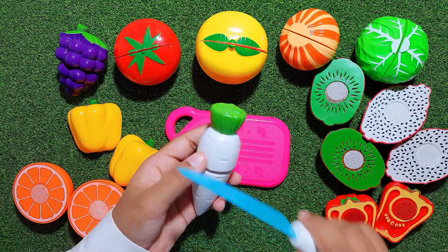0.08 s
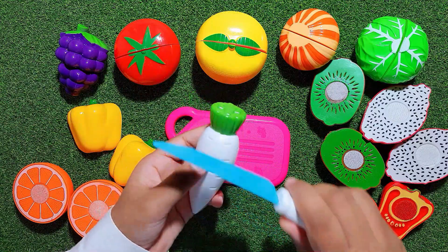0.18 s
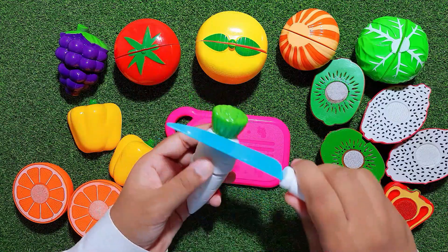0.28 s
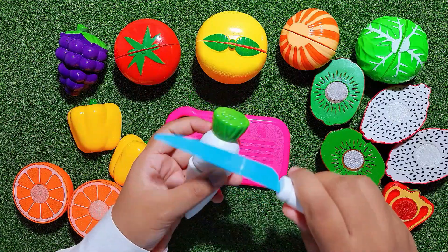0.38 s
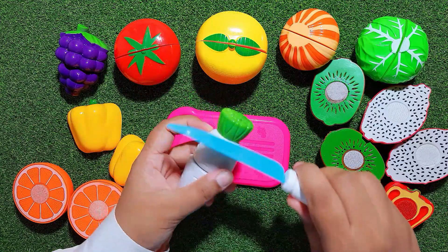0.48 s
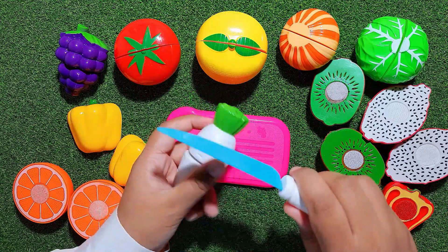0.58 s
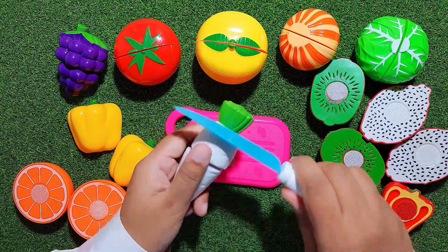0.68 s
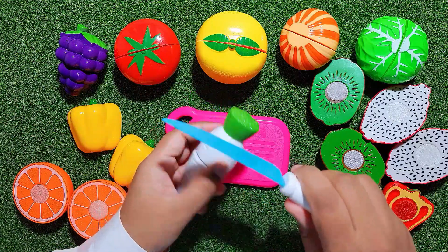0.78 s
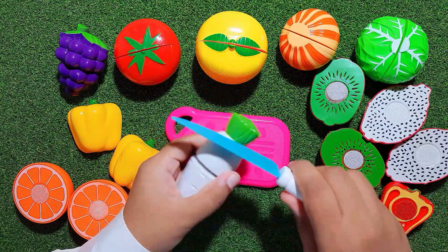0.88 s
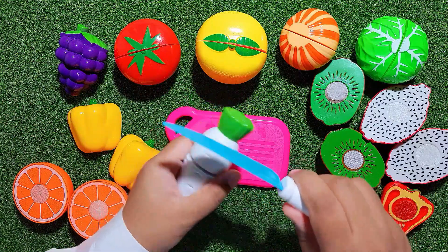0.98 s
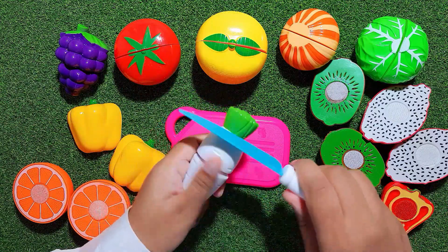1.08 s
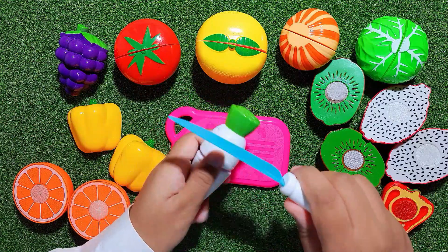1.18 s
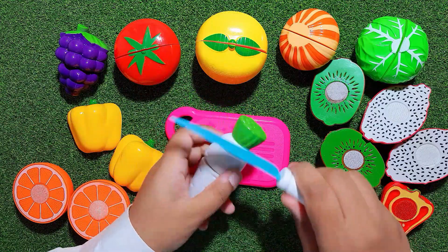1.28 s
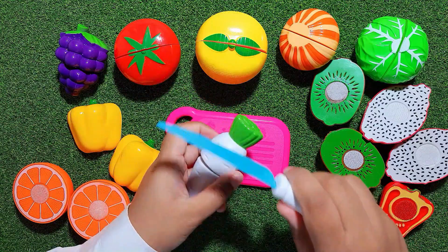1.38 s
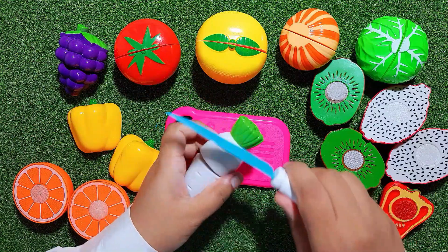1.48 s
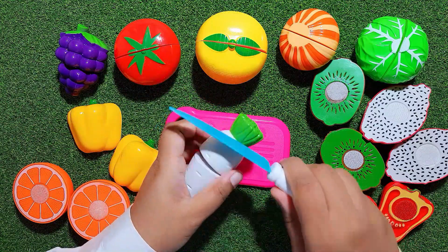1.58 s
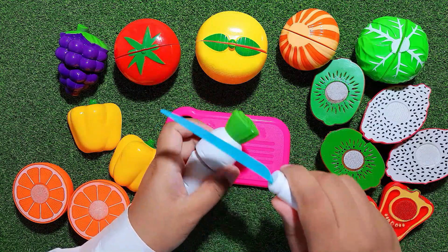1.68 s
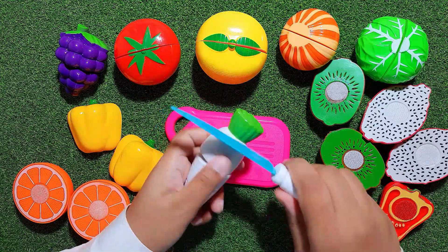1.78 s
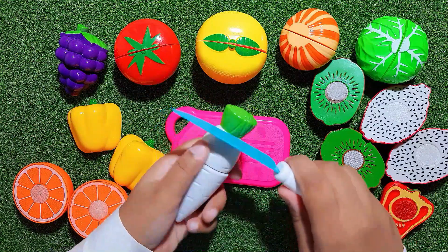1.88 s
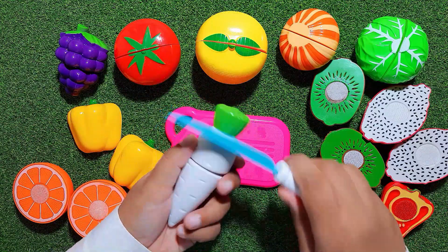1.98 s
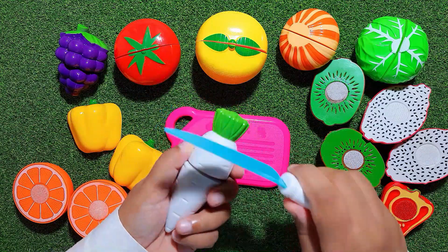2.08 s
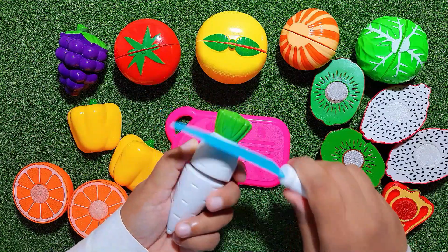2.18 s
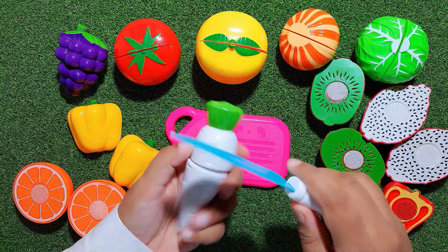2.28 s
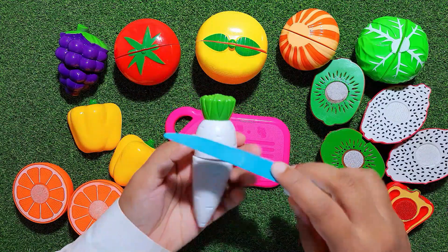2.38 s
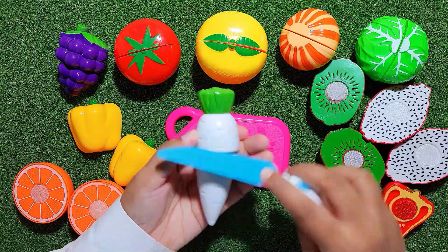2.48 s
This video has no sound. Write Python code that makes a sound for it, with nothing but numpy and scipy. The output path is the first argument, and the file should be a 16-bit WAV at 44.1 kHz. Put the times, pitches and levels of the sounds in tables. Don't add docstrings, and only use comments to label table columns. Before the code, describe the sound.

Sharp hollow plastic clacks, each after a tiny rasp, about five a second, close in a small room

```python
import sys
import numpy as np
from scipy import signal
from scipy.fft import rfft, irfft, next_fast_len
from scipy.io import wavfile
from scipy.ndimage import map_coordinates

SR = 44100
rng = np.random.default_rng(int(sys.argv[2]) if len(sys.argv) > 2 else 0)


def put_to_file(sound):
    columns = np.atleast_2d(sound).T
    safe = np.clip(columns, -1, 1)
    whole_steps = np.round(safe * 32767)
    wavfile.write(sys.argv[1], SR, whole_steps.astype(np.int16))


def gain_from_db(level_db):
    decades = np.asarray(level_db, float) / 20
    return 10 ** decades


N = 110250

# pitch_hz, density_db [dB per Hz]
RUMBLE_COLOUR = [(12, -43.5), (20, -13), (51, -0.5), (102, 7.5), (119, 1.5), (146, -6.5), (260, -17.5),
                 (340, -50), (570, -120)]
# time_s, level_db
TRAFFIC_LEVEL = [(0.0, -54), (0.05, -61.5), (1.31, -55), (1.38, -66), (1.45, -48.5), (1.5, -61),
                 (1.86, -60), (1.89, -51), (1.95, -59), (2.41, -58), (2.45, -59.5), (2.5, -65)]
# pitch_hz, density_db [dB per Hz]
HISS_COLOUR = [(250, 4.5), (400, -3.5), (1000, -10), (3000, -16), (4200, -21), (6000, -12), (9000, -16.5),
               (16000, -26)]
# pitch_hz, width_hz, level_db, pulses_per_s
INSECTS = [
    (5020, 500, 1.5, 61),
    (5158, 200, -2, 110),
    (5450, 190, 0, 77),
    (7220, 1100, 0.5, 260),
]
# time_s, level_db
INSECT_LEVEL = [(0.0, -73.5), (0.3, -72), (0.42, -70.5), (1.32, -71), (1.48, -72), (1.98, -70.5),
                (2.13, -71), (2.37, -71.5), (2.5, -77.5)]
# stop_s, length_s, level_db, seam_pitch_hz, brightness_db_per_octave
SEAM_SCRAPES = [(.249, 0.027, -35.5, 3950, 4.5), (0.456, 0.027, -31.5, 4200, 1),
                (0.687, 0.032, -37, 3333, 5), (.873, 0.025, -39.5, 4330, 1.5), (1.077, 0.03, -37, 3430, 5),
                (1.266, 0.017, -36.5, 4380, 1.5), (1.44, .032, -24, 4100, 1.5),
                (1.592, 0.026, -35, 3810, 0.7), (1.745, .025, -36, 3800, 7.13),
                (1.888, 0.019, -37, 3730, 0), (2.035, .026, -29.5, 5450, 1.8), (2.182, .03, -28, 5600, .1),
                (2.51, .025, -44.5, 4200, 6)]
# start_s, peak_db, shell_pitch_hz, thud_db, brightness_db_per_octave
SHELL_KNOCKS = [(0.2496, -9, 5000, -5, 1.7), (0.252, -25.5, 5500, 6, 2.5), (.457, -12.5, 4360, -1.5, 1),
                (0.4605, -14, 6000, -23, -2.5), (0.463, -13.5, 5900, -8.5, 2.5),
                (0.6836, -14.5, 3935, -17.5, -4.53), (0.874, -14.5, 4500, -2.5, -0.3),
                (.882, -22, 3330, -2, 1), (1.075, -13.5, 4270, -6.5, 0), (1.268, -16, 4500, -1.5, -0.5),
                (1.4166, -17.5, 4000, -23, 1.5), (1.446, -15, 4400, 1.5, 1.5), (1.592, -8, 4700, -8.5, -1),
                (1.7466, -11.5, 4440, -4.5, 1.9), (1.888, -12.5, 3970, -7, 0), (1.894, -24, 3930, -12, 12),
                (2.032, -11, 4100, -23, -1.5), (2.0318, -33, 5400, 9, -2.18), (2.0389, -14.5, 4260, 2, 0.5),
                (2.179, -15.5, 4024, -5, -3), (2.1815, -9, 5500, -4, -0.6), (2.184, -22, 6050, -20, -12.1),
                (2.453, -47, 7000, -9, 7)]
# pitch_hz, width_hz, level_db
SHELL_MODES = [(1110, 430, -6), (2200, 560, -5), (4100, 600, 1), (5400, 1020, -1.5), (8040, 530, -6),
               (10400, 920, -17), (13100, 6000, -36)]
# pitch_hz, decay_s
ROOM_DECAY = [(350, 0.23), (1000, 0.17), (2500, 0.23), (4200, 0.26), (6000, 0.22), (9000, 0.217),
              (15000, 0.26)]
# pitch_hz, level_db
ROOM_TONE = [(300, 4), (1000, 6.5), (2500, 2.7), (4200, 0.7), (7000, -0.95), (15000, -1)]
# pitch_hz, correlation [0 to 1]
ROOM_LIKENESS = [(200, 0.58), (700, 0.17), (1500, 0.067), (3000, 0.0045)]

SIDES = np.array([[0.5], [-0.5]])
STROKE_TIME = np.arange(SR // 10) / SR
SHELL_OWN_DB = 1.3


def unit(x):
    return x / np.sqrt(np.mean(x ** 2) + 1e-20)


def along(points, hz):
    point_hz, value = np.transpose(points)
    return np.interp(np.log(hz + 1), np.log(point_hz + 1), value)


def wobble(rate):
    knots = rng.standard_normal(int(N * rate / SR) + 4)
    return map_coordinates(knots, [np.arange(N) * rate / SR])


def filtered(x, response):
    n = x.shape[-1]
    size = 2 * next_fast_len(n // 2 + 2048)
    return irfft(rfft(x, size) * response(np.fft.rfftfreq(size, 1 / SR)), size)[..., :n]


def peak(f, hz, width_hz):
    return 1j * f * width_hz / (hz * hz - f * f + 1j * f * width_hz)


def add(track, s, sound):
    at = round(s * SR)
    track[at:at + len(sound)] += sound


def background():
    rumble, hiss = rng.standard_normal((2, 2, N))
    rumble = rumble + 0.07 * rumble[::-1]
    rumble = unit(filtered(rumble, lambda f: gain_from_db(along(RUMBLE_COLOUR, f))))
    traffic_db = np.interp(np.arange(N) / SR, *np.transpose(TRAFFIC_LEVEL))
    rumble_db, rumble_pan_db, hiss_db = 2.5, 1.5, -67
    hiss = unit(filtered(hiss, lambda f: gain_from_db(along(HISS_COLOUR, f)) * f / (f + 150)))
    return gain_from_db(rumble_db + rumble_pan_db * SIDES + traffic_db) * rumble + gain_from_db(hiss_db) * hiss


def insects():
    pulse_depth_db, swell_db = 2.5, 1
    t = np.arange(N) / SR
    chorus = np.zeros((2, N))
    for hz, width_hz, db, rate_hz in INSECTS:
        swell = swell_db * wobble(12)
        pulse = pulse_depth_db * np.sin(2 * np.pi * rate_hz * t + 1.19 * wobble(22))
        band = filtered(rng.standard_normal((2, N)), lambda f: peak(f, hz, width_hz) ** 3)
        chorus += gain_from_db(db + swell + pulse) * unit(band)
    return gain_from_db(np.interp(t, *np.transpose(INSECT_LEVEL))) * chorus


def shell(f, own_hz, tilt_db, low_hz, thud_db, own_db):
    modes = SHELL_MODES + [(own_hz, 390, own_db), (842, 1370, thud_db)]
    power = sum(np.abs(gain_from_db(db) * peak(f, hz, width_hz)) ** 2 for hz, width_hz, db in modes)
    power = power * gain_from_db(2 * tilt_db * np.log2(np.maximum(f / own_hz, 0.5)))
    power = power / (1 + (low_hz / (f + 1)) ** 5)
    cepstrum = irfft(np.log(power + 1e-9))
    cepstrum[0] /= 2
    cepstrum[len(f):] = 0
    return np.exp(rfft(cepstrum))


def hook_ticks():
    hooks_per_s, spread_db, shared_hz = 15000, 1.5, 1800
    chance, sign, size = rng.random((3, 2, len(STROKE_TIME)))
    ticks = (chance < hooks_per_s / SR) * np.sign(sign - 0.5) * gain_from_db(-spread_db * np.log(size + 1e-9))
    swap = filtered(ticks[::-1] - ticks, lambda f: 0.5 ** 0.5 / (1 + (f / shared_hz) ** 2))
    return ticks + swap * [[1], [0]]


def scrapes():
    rise_share, rise_db, release_s = 0.71, 33.5, 0.035
    low_hz, thud_db, seam_db = 400, -21, 6
    out, t = np.zeros((N + SR, 2)), STROKE_TIME
    for stop, length, db, hz, tilt_db in SEAM_SCRAPES:
        ticks = hook_ticks()
        clumps_db = 1.8 * np.clip(wobble(700)[:len(t)], -3, 1.5)
        swell_db = -rise_db * np.clip(1 - t / (rise_share * length), 0, 1)
        stop_db = -60 * np.clip(t - length, 0, 1) / release_s
        ring = lambda f: shell(f, hz, tilt_db, low_hz, thud_db, SHELL_OWN_DB + seam_db)
        steady_level = np.std(filtered(ticks, ring))
        shaped = ticks * gain_from_db(db + clumps_db + swell_db + stop_db) / steady_level
        add(out, stop - length, filtered(shaped, ring).T)
    return out[:N].T


def knocks():
    shared_hz, shared_rest = 2593, 0.32
    rattle_db, rattle_s, low_hz = -9.5, 0.011, 389
    crest = 0.23
    out, t = np.zeros((N + SR, 2)), STROKE_TIME
    upper = lambda f: 1j * f / (shared_hz + 1j * f)
    for s, db, hz, thud_db, tilt_db in SHELL_KNOCKS:
        blow = filtered(1.0 * (t == 0), lambda f: 1 - (1 - shared_rest) * upper(f))
        rattle = rng.standard_normal((2, len(t))) * gain_from_db(rattle_db - 60 * t / rattle_s)
        rattle = filtered(rattle, lambda f: upper(f) ** 2)
        ring = filtered(blow + rattle, lambda f: shell(f, hz, tilt_db, low_hz, thud_db, SHELL_OWN_DB))
        add(out, s, gain_from_db(db) * ring.T / (crest * np.linalg.norm(ring)))
    return out[:N].T


def room_tail():
    hz, t, noise = signal.stft(rng.standard_normal((2, SR // 2)), SR, nperseg=128)
    turn = np.arccos(np.clip(along(ROOM_LIKENESS, hz), -1, 1))[:, None] / 2
    level_db = along(ROOM_TONE, hz)[:, None] - 60 * t / along(ROOM_DECAY, hz)[:, None]
    mid, side = noise * [np.cos(turn), np.sin(turn)] * gain_from_db(level_db)
    tail = signal.istft(np.array([mid + side, mid - side]), SR, nperseg=128)[1]
    return tail / np.linalg.norm(tail[0])


def room(x):
    gap_s = 0.0024
    out = np.zeros((N + SR, 2))
    starts = [round((stop - length) * SR) for stop, length, *_ in SEAM_SCRAPES[1:]]
    edges = [0] + starts + [N]
    for a, b in zip(edges, edges[1:]):
        add(out, a / SR + gap_s, signal.fftconvolve(x[:, a:b], room_tail(), axes=1).T)
    return out[:N].T


def scene():
    pan_db, left_lag_s, room_db, room_pan_db = -3.8, 0.000118, -7.5, -1.5
    far = background() + insects()
    knife = scrapes() + knocks()
    place = lambda f: gain_from_db(pan_db * SIDES) * np.exp(-2j * np.pi * f * left_lag_s * SIDES)
    return far + filtered(knife, place) + gain_from_db(room_db + room_pan_db * SIDES) * room(knife)


def band_limit(x):
    return signal.sosfilt(signal.butter(12, 16630, fs=SR, output="sos"), x)


def record(dry):
    mix = filtered(dry, lambda f: 1 / (1 + (f / 15900) ** 80))
    return band_limit(mix)


dry = scene()
out = record(dry)
put_to_file(out)
```